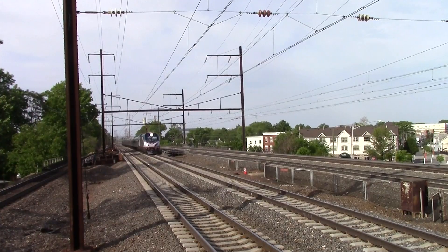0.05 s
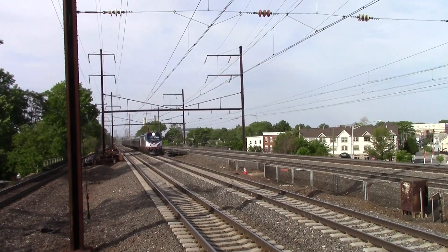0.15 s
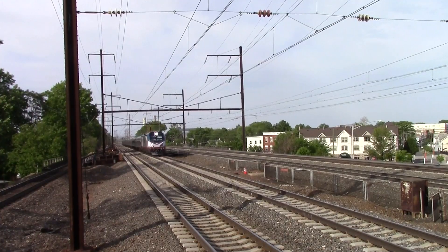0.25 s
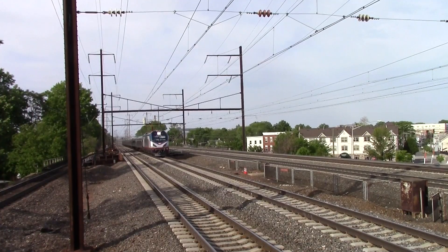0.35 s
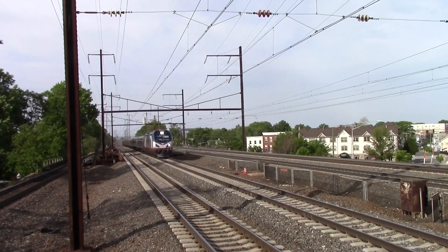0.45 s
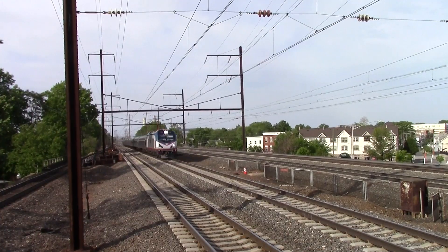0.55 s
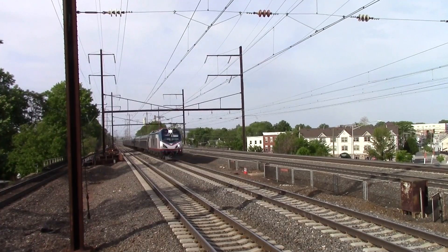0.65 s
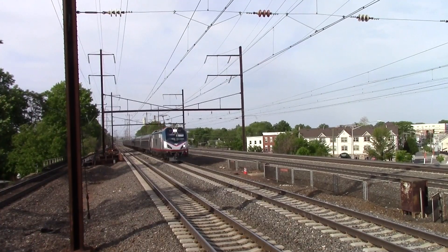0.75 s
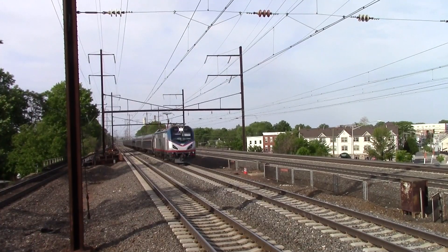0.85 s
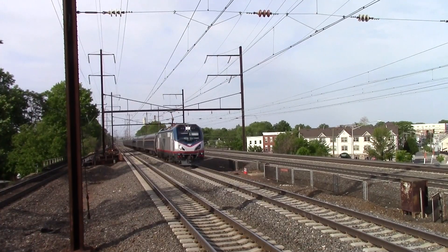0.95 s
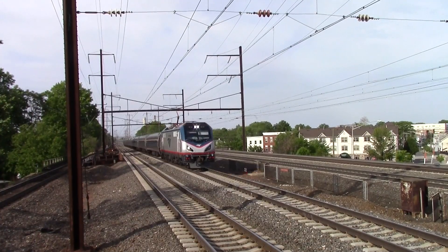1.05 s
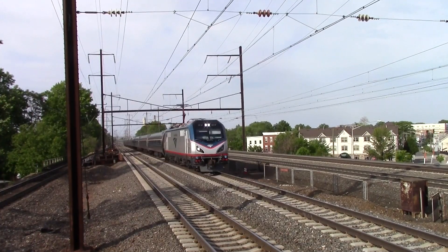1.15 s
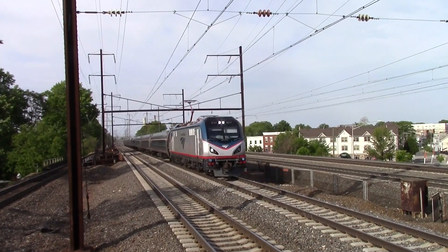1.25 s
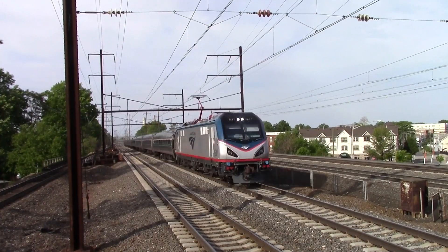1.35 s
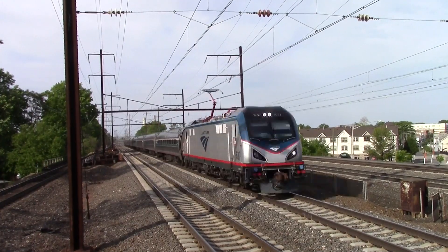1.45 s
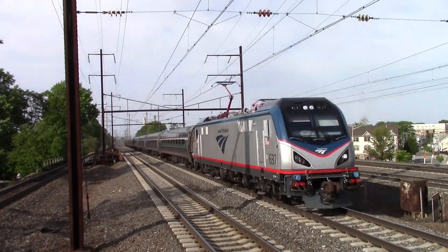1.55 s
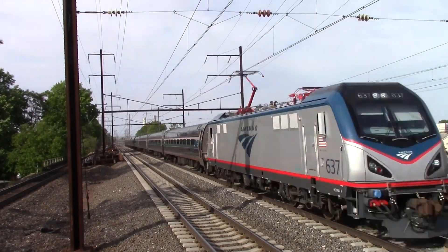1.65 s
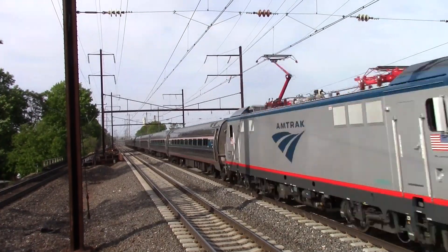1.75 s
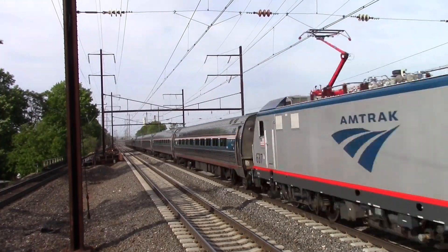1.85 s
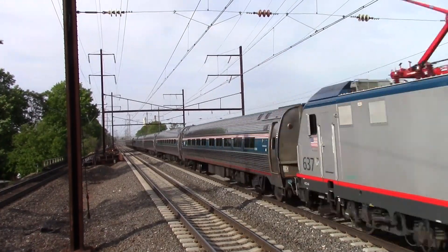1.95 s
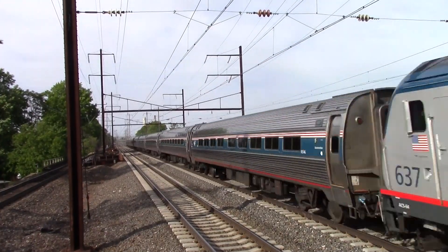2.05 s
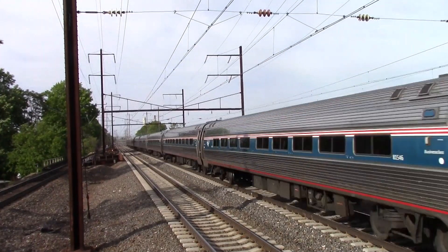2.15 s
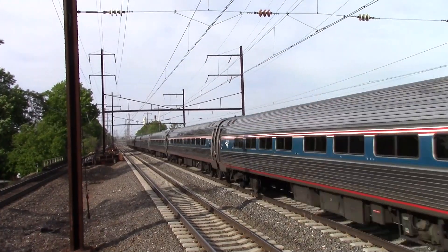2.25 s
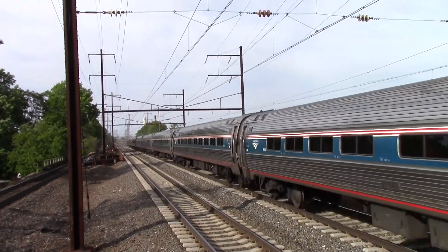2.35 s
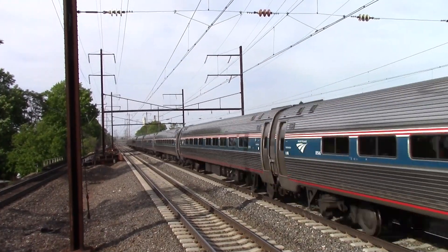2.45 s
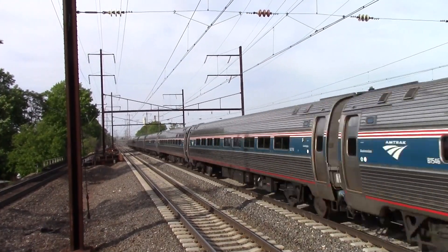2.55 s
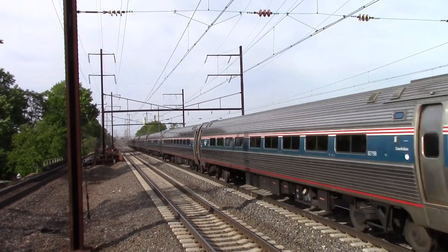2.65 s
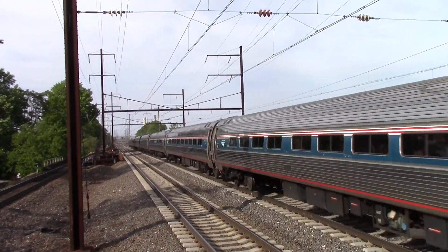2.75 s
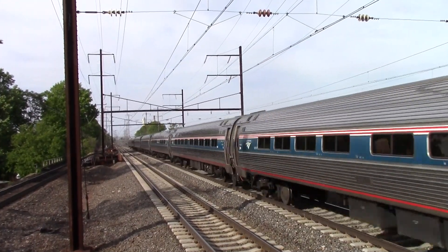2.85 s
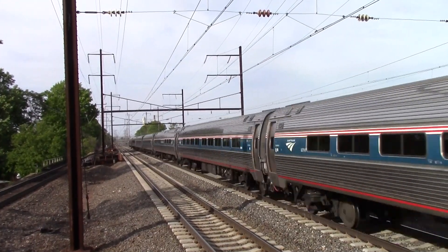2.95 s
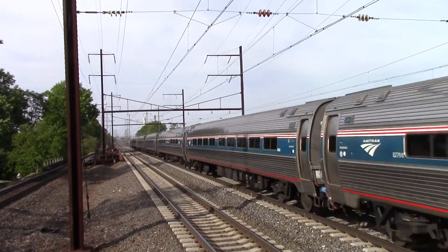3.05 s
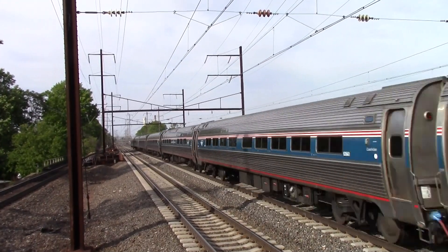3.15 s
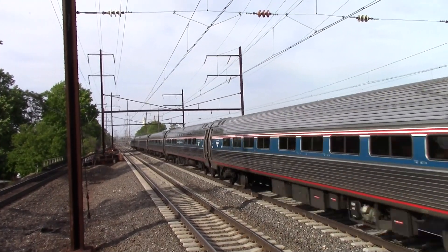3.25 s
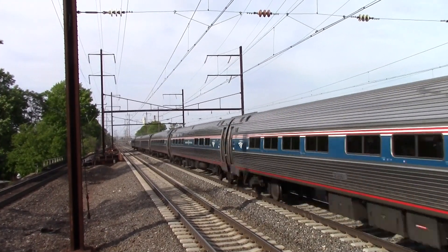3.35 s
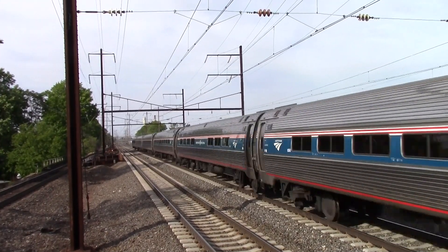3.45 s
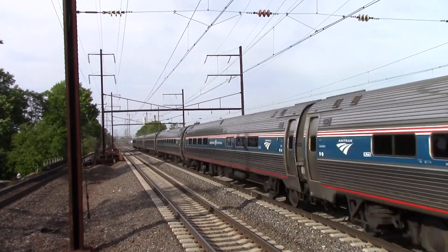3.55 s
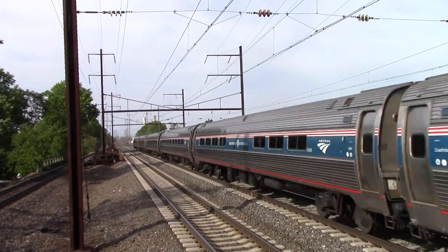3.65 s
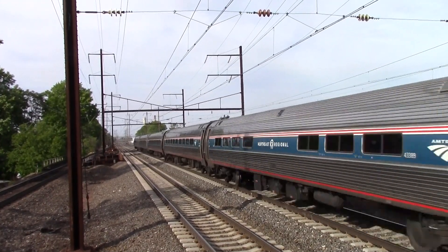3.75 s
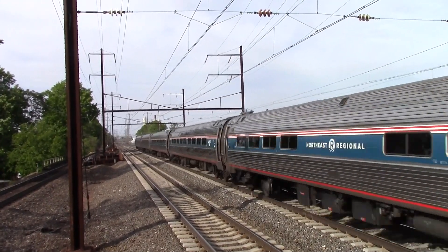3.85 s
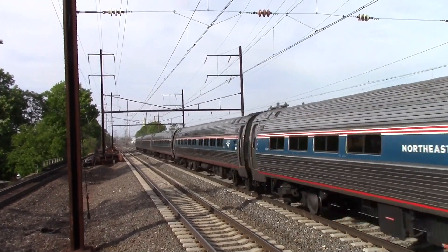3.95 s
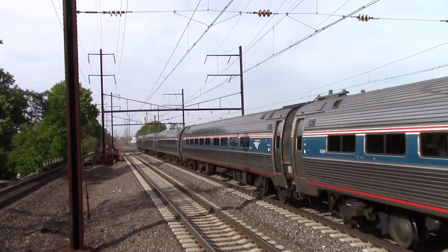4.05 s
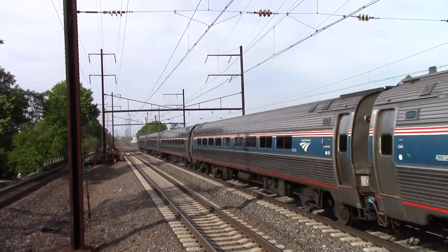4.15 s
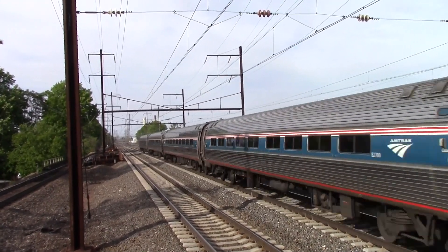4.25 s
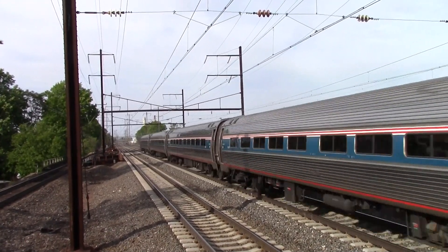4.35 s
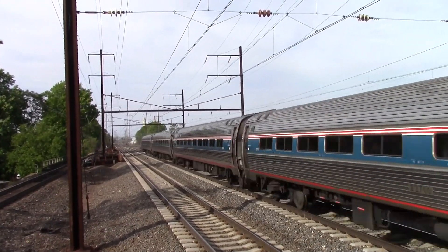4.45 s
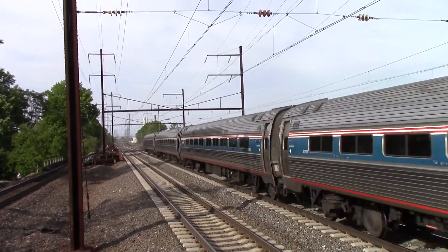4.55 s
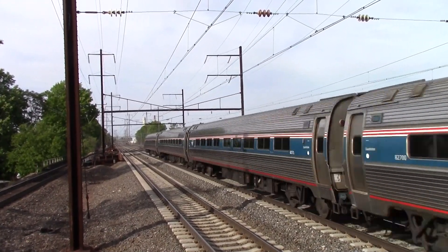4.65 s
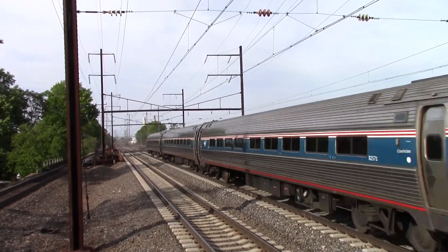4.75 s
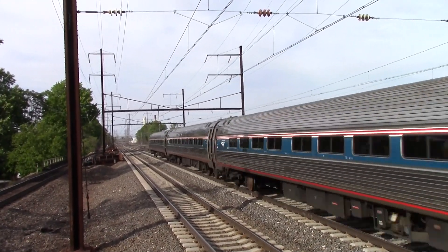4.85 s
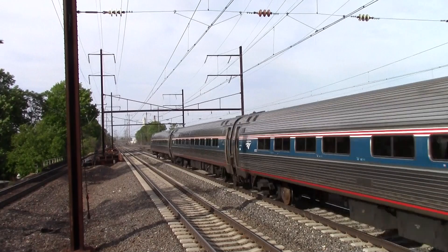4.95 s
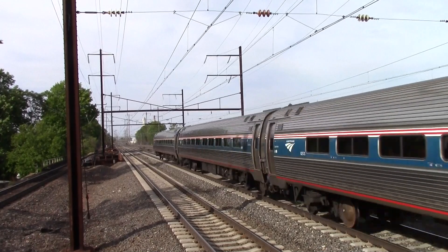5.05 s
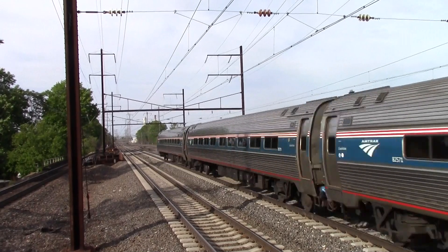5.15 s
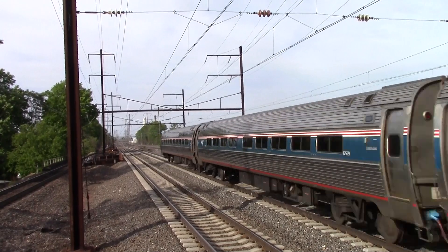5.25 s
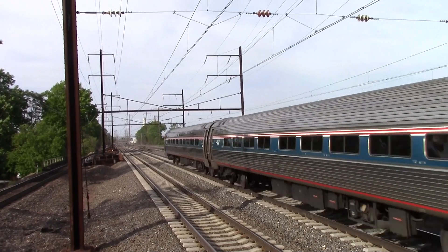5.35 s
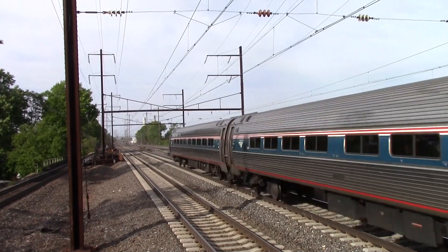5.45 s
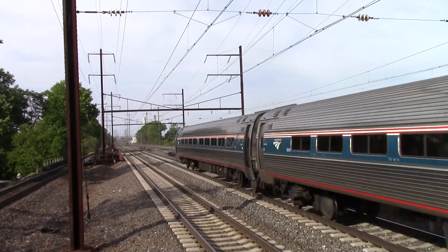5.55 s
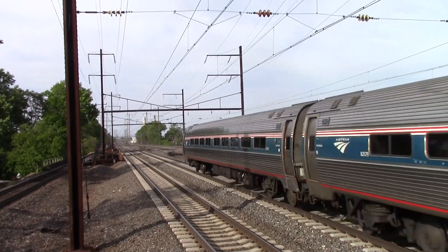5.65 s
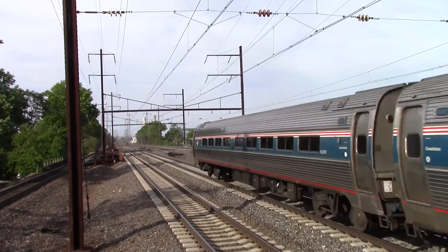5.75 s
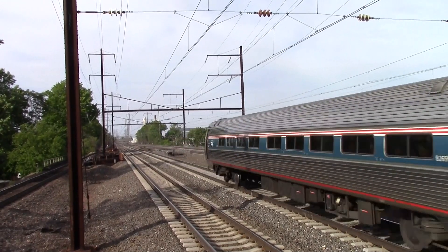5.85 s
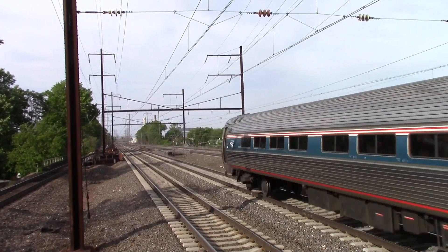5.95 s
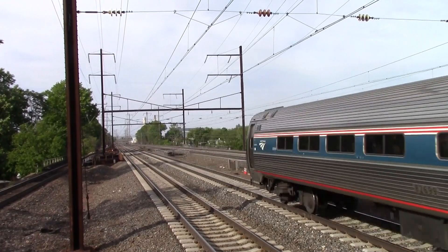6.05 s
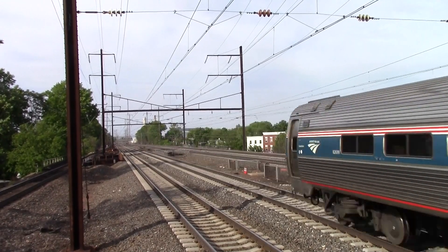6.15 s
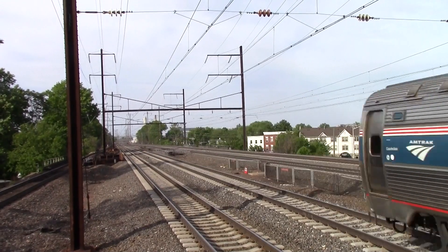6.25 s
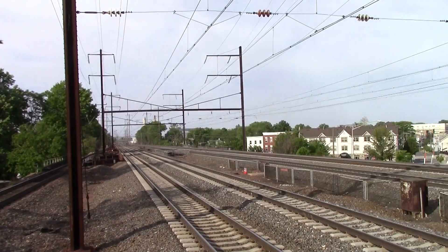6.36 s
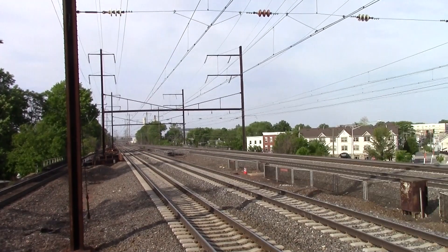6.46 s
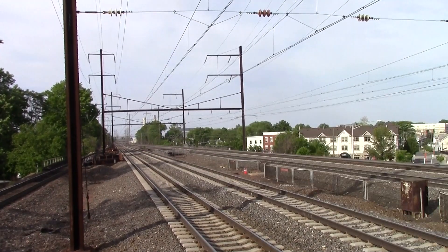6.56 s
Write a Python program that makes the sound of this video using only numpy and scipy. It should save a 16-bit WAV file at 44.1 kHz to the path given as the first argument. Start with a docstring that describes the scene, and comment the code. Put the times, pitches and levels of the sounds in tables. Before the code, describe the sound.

Faint rail hum and a horn blast swell into a loud rushing locomotive pass, followed by pulsing coach roll and sharp wheel clacks.

```python
"""An electric train runs past at speed, a few metres from the listener: noise layers roar, roll and hiss.
Far off the rails sing in narrow noise bands; a five-bell horn, built from sines, sags in pitch as it nears.
The locomotive roars by with a falling howl, then coaches roll past in swells, one for each pair of bogies.
Wheels clatter over rail joints as short noise bursts with ringing rims, and thin falling whistles pass."""
import sys
import numpy as np
from scipy import signal
from scipy.fft import rfft, irfft, next_fast_len
from scipy.io import wavfile
from scipy.ndimage import uniform_filter1d, map_coordinates

SR = 44100
rng = np.random.default_rng(int(sys.argv[2]) if len(sys.argv) > 2 else 0)


def put_to_file(sound):
    """Save the sound as 16-bit audio at rate SR, in the file named by the first command-line argument."""
    columns = np.atleast_2d(sound).T  # one column per channel
    safe = np.clip(columns, -1, 1)
    whole_steps = np.round(safe * 32767)
    wavfile.write(sys.argv[1], SR, whole_steps.astype(np.int16))


N = 290751

# The running train between wheel blows, before swells and trims.
# Each row: time in seconds, rush in dB, low body in dB, hiss in dB.
TRAIN_LEVELS = [(0, -42, -71, -73), (0.35, -35.5, -65, -58), (0.65, -37.5, -60, -51.5),
                (0.86, -28.5, -50.5, -38.5), (1.02, -25.5, -56, -33), (1.2, -18.5, -46, -28.5),
                (1.62, -15, -39, -21.5), (1.74, -17, -34, -21.5), (1.87, -13.5, -35.5, -23.5),
                (2.33, -13.5, -44, -26.5), (2.6, -20.5, -44.5, -31), (2.77, -25, -69, -35),
                (3.6, -25, -69, -39.5), (4.12, -25, -67.5, -38), (4.42, -25.5, -61.5, -34.5),
                (5.22, -27, -57.5, -39.5), (5.65, -21, -47, -32), (6.3, -17, -41.5, -31.5),
                (6.59, -19.5, -41.5, -37.5)]
# Singing wheel rims within the rolling noise, before the rush level. Each row: time in seconds, level in dB.
RIM_SONG_LEVELS = [(5.2, -10.5), (5.6, -8)]

# Noise colours, made rms 1 before use. Each row: frequency in Hz, relative level in dB per Hz.
FAR_ROAR_COLOUR = [(150, -43), (300, -26.5), (430, -19), (560, -25), (760, -5), (980, -2.5), (1400, -1),
                   (1800, 1.5), (2800, -4), (3900, -9), (4900, -14), (6500, -51)]
LOCO_ROAR_COLOUR = [(250, -30.5), (420, -14.5), (522, -38), (566, -17), (613, -24), (695, -8.5), (780, -14),
                    (1110, -3.5), (1520, 1.5), (1860, -0.5), (3120, -5), (3580, -10), (6500, -26),
                    (8450, -27), (14300, -120)]
ROLLING_COLOUR = [(260, -66), (450, -64), (651, -13.5), (711, -14.5), (1010, -7), (1290, -6.5),
                  (1420, -3.5), (1610, -0.5), (1820, -1), (2100, 1.5), (2720, -5.5), (2970, -4.5),
                  (3220, -8.5), (4600, -18.5), (6500, -16.5), (8450, -26), (14300, -120)]
BODY_COLOUR = [(100, -44), (190, -35), (280, -6.5), (400, 1.5), (560, 8), (800, 12.5), (1500, -32)]  # the car bodies' low roar
AHEAD_HISS_COLOUR = [(3500, 4), (4700, 1), (5700, -3), (6800, -1), (8400, -5), (11000, -14), (13500, -27),
                     (15500, -51)]  # the hiss while the train is still ahead
BESIDE_HISS_COLOUR = [(2470, 1), (4200, 6.5), (5890, 4.5), (8220, 2), (12500, -13), (15500, -38)]
LOW_NOISE_COLOUR = [(20, -3), (130, -2), (300, 0), (600, -34)]  # faint low noise that comes up when the train is loud
BLOW_COLOUR = [(260, -41), (450, -60), (673, -15.5), (1040, -6), (1300, -5.5), (1640, 5), (1840, -2.5),
               (2190, 4.5), (2600, -3), (2920, -1.5), (3780, -9.5), (4120, -12), (7880, -21.5),
               (11000, -35), (14000, -72)]  # the steely crack of wheel on joint
THUD_COLOUR = [(120, -54), (250, -10.5), (450, -10.5), (650, 7), (800, 12.5), (1100, 7.5), (2200, -43)]
SPIT_COLOUR = [(1300, 0), (3500, 2), (8500, -16), (14000, -48)]  # air as the horn's valve opens
FLOOR_COLOUR = [(60, -26), (300, -8), (6000, 2.5), (10000, 2.5), (13000, -4), (15500, -25)]  # the faint steady hiss under everything

# Resonances of the rails far ahead, and of the coach wheels' rims.
# Each row: frequency in Hz, distance from it to half amplitude in Hz, relative level in dB.
RAIL_MODES = [(1106, 35, -14), (1356, 32, -8.5), (1453, 24, -9), (1790, 93, -19.5)]
RIM_MODES = [(1570, 42, -18), (2100, 48, -19), (2230, 185, 13.5), (2980, 76, -4.5)]

# Stereo width of the noise. Each row: frequency in Hz, side minus mid in dB.
STEREO_WIDTH = [(60, -11), (350, -60), (900, -60), (1300, -38), (2400, -28), (4500, -14), (8500, -3),
                (12000, 6)]
# Stereo balance. Each row: frequency in Hz, left minus right in dB.
STEREO_LEAN = [(1700, 0), (2400, 1.5), (3400, 1.2), (4800, 2.6), (7000, 1.2), (9500, 1.6), (13000, -1.2)]
# Stereo phase. Each row: frequency in Hz, lead of the right ear in radians.
RIGHT_EAR_LEAD = [(4000, 0), (6300, 0.79), (8500, 0.24), (11000, 0.56)]

# The horn's bells as heard from far ahead. Each row: pitch in Hz, then harmonics 1 to 7 in dB.
HORN_BELLS = [(367, -34.5, -34, -22, -24.5, -29, -34, -40), (436.4, -31.5, -25.5, -28, -26, -28, -47, -30),
              (504.4, -30, -25, -23, -26.5, -25, -36, -39), (576, -33, -30, -31, -35, -32, -38, -44),
              (704.6, -30.5, -27.5, -28, -25.5, -32, -37, -41)]
# Horn blasts, the first one faint, before distance gain.
# Each row: start in seconds, end in seconds, level in dB.
HORN_BLASTS = [(0, 0.273, -21), (1.001, 1.691, 1)]
# Wheels striking the rail joints, mostly in pairs as a bogie's two axles cross. Each row: start in
# seconds, relative level in dB, length of the rattle in seconds, thud relative to the blow in dB.
WHEEL_STRIKES = [(1.87, 1, .035, -15), (2.057, -9.5, 0.04, -12), (2.12, -3, 0.025, -11),
                 (2.257, -3, 0.047, -14), (2.319, 1.5, 0.028, -19), (2.455, -9, 0.021, -10),
                 (2.511, -11, 0.012, -6), (2.64, -3.5, 0.044, -17.5), (2.69, -8.5, .028, -25),
                 (2.793, -7.5, 0.043, -34), (2.843, -10.5, 0.052, -24), (2.885, -13, .018, -29),
                 (2.977, -7.5, 0.026, -20), (3.029, -7.5, 0.034, -25), (3.154, -5.5, 0.023, -22),
                 (3.175, -6.5, 0.018, -31), (3.212, -8.5, 0.065, -31), (3.341, -4, 0.039, -22),
                 (3.393, -6.5, 0.04, -24), (3.496, -12.5, 0.025, -13.5), (3.689, -12.5, 0.041, -31),
                 (3.736, -7.5, 0.029, -35), (3.885, -10, 0.059, -29), (3.918, -9, 0.039, -32),
                 (4.076, -6, 0.034, -30), (4.212, -4, 0.044, -23.5), (4.263, -6.5, 0.026, -27),
                 (4.368, -7, 0.028, -37), (4.391, -7.5, 0.06, -25), (4.44, -9.5, 0.047, -19),
                 (4.551, -6, 0.031, -20), (4.605, -7, 0.028, -21.5), (4.733, -6.5, 0.038, -27),
                 (4.786, -8.5, 0.028, -27), (4.917, -5.5, 0.037, -21), (4.968, -6.5, 0.044, -24),
                 (5.105, -9, .018, -31), (5.26, -8, 0.034, -14.5), (5.314, -11.5, 0.038, -18),
                 (5.444, -2, 0.032, -17), (5.494, -10.5, 0.032, -11.5), (5.554, -5.5, 0.0087, -27),
                 (5.612, -9, 0.015, -14), (5.785, -2, 0.046, -12.5), (5.95, -2.5, 0.028, -19),
                 (5.973, -2.5, 0.05, -11.5), (6.02, -6.5, 0.024, -11), (6.133, 2, 0.02, -15.5),
                 (6.185, 0.5, 0.053, -18.5), (6.311, 0, 0.031, -15.5), (6.358, -4, 0.031, -24),
                 (6.419, -1, 0.021, -24), (6.468, -5.5, 0.027, -30), (6.503, 0, 0.011, -13),
                 (6.522, -3.5, 0.035, -18), (6.583, -3, 0.0099, -12)]
# Howl swells of the locomotive's running gear.
# Each row: loudest moment in seconds, level in dB, time from it to 1/e in seconds.
HOWL_SWELLS = [(1.935, -11, 0.028), (2.11, -15, 0.01), (2.155, -16, 0.026), (2.204, -14, .016),
               (2.39, -13.5, 0.026)]
# Thin falling whistles from passing bogies. Each row: loudest moment in seconds, level in dB,
# time from it to 1/e in seconds, pitch at the loudest in Hz.
BOGIE_WHISTLES = [(4.83, -35, 0.049, 8430), (5.545, -40, 0.088, 8450), (6.04, -38, 0.05, 8500),
                  (6.378, -37, 0.083, 8650)]

SPEED_M_S = 49.5
# when the first coach reaches the rail joints, and the time each coach takes to go by
FIRST_COACH_S, COACH_S = 2.273, 0.525
# swell peak after the front bogie meets the first joint, and dB per unit of swell
SWELL_LAG_S, SWELL_RUSH_DB, SWELL_HISS_DB = 0.048, 0.76, 2
# depth of drifting patches: distant roar and air hiss, rolling wheels, low noise
SMOOTH_PATCHY_DB, ROLLING_PATCHY_DB, LOW_NOISE_PATCHY_DB = 1.2, 2.1, 6
# how hard rough treads shake the lower bands: under the locomotive, under the coaches
LOCO_SHAKE_DB, COACH_SHAKE_DB = 1.7, 0.6
LOW_NOISE_BASE_DB = -54  # low noise level when the rush is at -9.5 dB

# when the horn draws level, and how far away it is then
HORN_PASS_S, TRACK_M = 1.92, 4.2
HORN_NEARING_DB = 13  # gain for a tenfold shorter distance
HORN_ATTACK_S, HORN_RELEASE_S = 0.011, 0.035
HORN_BEAM_DB_PER_KHZ = 15  # the bells beam their treble forward: its loss when heard side-on
HORN_ECHO_S, HORN_ECHO_DB, HORN_ECHO_DULL_DB_PER_KHZ = 0.13, -2.5, 9  # off the trackside
SPIT_DB, SPIT_S = -19.5, 0.032  # level and decay time
BRASS_DB, BRASS_FALL_DB_PER_KHZ = -33.5, 6  # the harmonics above the seventh; they fall from 3 kHz
HORN_FLUTTER_DB = 2.2
HORN_SCATTER_RAD = 0.45  # phase scatter, times kHz + 0.5 (at most 2)
# from afar the ground's echo cancels the middle harmonics, until the dip fills in between two times
GROUND_DIP_DB, GROUND_DIP_HZ, GROUND_DIP_OCTAVES = 10, 1180, 1
GROUND_FILL_S = (1.255, 1.35)

STRIKE_ATTACK_S, CHATTER_DB, THUD_PATCHY_DB = 0.001, 1.4, 0.8
THUMP_DB, THUMP_PATCHY_DB = -70, 4  # faint low thump under hard blows
HOWL_HZ, HOWL_FALL_HZ_PER_S = 1548, 480  # pitch at the first swell, and its fall
WHISTLE_WIDTH_HZ = 420
TOP_HZ = 15650


def amp(db):
    """Decibels to gain."""
    return 10 ** (np.asarray(db) / 20)


def unit(x):
    """Scaled to rms 1."""
    return x / np.sqrt(np.mean(x ** 2) + 1e-20)


def along(points, hz):
    """(Hz, value) points joined on a log frequency axis."""
    f, v = np.transpose(points)
    return np.interp(np.log(hz + 1), np.log(f + 1), v)


def clock():
    """The time of each sample in seconds."""
    return np.arange(N) / SR


def curves(rows):
    """One value per sample for each column after the time."""
    s, *columns = np.transpose(rows)
    return [np.interp(clock(), s, column) for column in columns]


def wobble(rate):
    """A smooth random curve with rate knots a second."""
    return map_coordinates(rng.standard_normal(2048), [clock() * rate + 2], mode="wrap")


def filtered(x, response):
    """x filtered by a response given as a function of frequency."""
    m = next_fast_len(N + 8192)
    spectrum = rfft(x, m) * response(np.fft.rfftfreq(m, 1 / SR))
    return irfft(spectrum, m)[..., :N]


def shaped(colour):
    """The response of (Hz, dB) points, falling away below the first."""
    return lambda hz: amp(along(colour, hz)) * np.minimum(hz / colour[0][0], 1) ** 2


def resonant(modes):
    """The response of a set of resonances with steep skirts."""
    def response(hz):
        total = 0
        for centre, width, db in modes:
            detuning = (hz ** 2 - centre ** 2) / (2 * width)
            total = total + amp(db) * hz ** 2 / (hz ** 2 + detuning ** 2)
        return total
    return response


def rush(response, patchy_db):
    """Stereo noise, its mid at rms 1, with gain drifting in patches; STEREO_WIDTH parts the ears."""
    z = signal.stft(rng.standard_normal((2, N)), nperseg=1024)[2]
    field = rng.standard_normal(z.shape[1:])
    field = uniform_filter1d(field, size=5, axis=0)  # smooth over frequency
    field = uniform_filter1d(field, size=7, axis=1)  # and over time
    pair = signal.istft(z * amp(patchy_db * unit(field)), nperseg=1024)[1][:, :N]

    def mid_side_response(hz):
        return response(hz) * np.array([np.ones_like(hz), amp(along(STEREO_WIDTH, hz))])

    mid, side = filtered(pair, mid_side_response)
    return np.array([mid + side, mid - side]) / np.std(mid)


def handover(start, end):
    """Equal-power gains of a source that leaves and one that arrives."""
    progress = np.clip((clock() - start) / max(end - start, 0.01), 0, 1)
    turn = np.pi / 2 * progress
    return np.cos(turn), np.sin(turn)


def band(centre_hz, width_hz):
    """Narrow noise of rms 1 around a fixed or moving centre."""
    slow = filtered(rng.standard_normal((2, N)), lambda hz: 1 / (1 + (hz / width_hz) ** 2))
    phase = 2 * np.pi * np.cumsum(centre_hz * np.ones(N)) / SR
    return unit(slow[0] * np.cos(phase) + slow[1] * np.sin(phase))


def swells():
    """0.5 while bogies go by; after the first coach, a short lull to -1.5 under each coach's middle."""
    cycles = (clock() - SWELL_LAG_S - FIRST_COACH_S) / COACH_S
    return 0.5 - 2 * (cycles > 1) * np.sin(np.pi * cycles) ** 4


def running_noise():
    """Wheels, air and car bodies roar: first far off, then from the locomotive, then from the coaches."""
    rush_db, body_db, hiss_db = curves(TRAIN_LEVELS)
    rim_db, = curves(RIM_SONG_LEVELS)
    swell = swells()
    rush_db = rush_db + SWELL_RUSH_DB * swell
    hiss_db = hiss_db + SWELL_HISS_DB * swell
    far, arrived = handover(1.12, 1.36)
    leaving, coaches = handover(2.11, 2.84)
    ahead, beside = handover(1.81, 1.86)

    distant = amp(2.0) * far * rush(shaped(FAR_ROAR_COLOUR), patchy_db=SMOOTH_PATCHY_DB)
    roar = amp(0.5) * arrived * leaving * rush(shaped(LOCO_ROAR_COLOUR), patchy_db=1.5)
    treads = rush(shaped(ROLLING_COLOUR), patchy_db=ROLLING_PATCHY_DB)
    rims = amp(rim_db) * rush(resonant(RIM_MODES), patchy_db=2.0)
    rolling = coaches * (treads + rims)
    body = amp(body_db + 9.5) * rush(shaped(BODY_COLOUR), patchy_db=2.5)

    # close by, rough treads shake the lower bands together
    shake_db = LOCO_SHAKE_DB * beside * leaving ** 2 + COACH_SHAKE_DB * coaches ** 2
    shake = amp(shake_db * wobble(75))

    hiss_ahead = ahead * rush(shaped(AHEAD_HISS_COLOUR), patchy_db=SMOOTH_PATCHY_DB)
    hiss_beside = beside * rush(shaped(BESIDE_HISS_COLOUR), patchy_db=SMOOTH_PATCHY_DB)
    hiss = amp(hiss_db + 0.5) * (hiss_ahead + hiss_beside)

    # faint low noise that comes up when the train is loud: 2 dB for each dB of rush
    low_gain = arrived * amp(LOW_NOISE_BASE_DB + 2 * (rush_db + 9.5))
    low_noise = low_gain * rush(shaped(LOW_NOISE_COLOUR), patchy_db=LOW_NOISE_PATCHY_DB)
    return shake * (amp(rush_db) * (distant + roar + rolling) + body) + hiss + low_noise


def rail_song(level_db=-38.5, growth_db=6.0):
    """Rails carry narrow, wavering tones far ahead of the train, growing by growth_db a second."""
    far, _ = handover(1, 1.2)
    gain = far * amp(level_db + growth_db * clock() + 1.6 * wobble(11.9))
    return gain * rush(resonant(RAIL_MODES), patchy_db=0.5)


def horn_chord(doppler, dull_db_per_khz):
    """Five reed bells, hollow from afar and fuller close by; turbulent air makes short waves waver most."""
    chord = np.zeros(N)
    span = clock() < HORN_PASS_S
    t = clock()[span]
    dull = dull_db_per_khz[span]

    def waver(rate):
        coarse = t[::64]
        knots = rng.standard_normal(256)
        return np.interp(t, coarse, map_coordinates(knots, [coarse * rate], mode="wrap"))

    afar = np.interp(t, GROUND_FILL_S, [1, 0])
    for pitch, *harmonics in HORN_BELLS:
        heard_hz = pitch * doppler[span] * (1 + 0.0014 * waver(25.0))
        phase = 2 * np.pi * np.cumsum(heard_hz) / SR
        for k in range(1, int(7500 / pitch) + 1):
            khz = k * pitch / 1000
            brass_db = BRASS_DB - BRASS_FALL_DB_PER_KHZ * max(khz - 3, 0)
            db = harmonics[k - 1] if k <= len(harmonics) else brass_db
            octaves = np.log2(k * pitch / GROUND_DIP_HZ)
            db = db - GROUND_DIP_DB * afar * np.exp(-(octaves / GROUND_DIP_OCTAVES) ** 2)
            depth_db = min(4 * khz, 2.3)
            flicker_db = depth_db * waver(13.05) + HORN_FLUTTER_DB * waver(55.27)
            scatter = HORN_SCATTER_RAD * min(khz + 0.5, 2) * waver(28)
            tone = np.sin(k * phase + scatter + rng.uniform(0, 2 * np.pi))
            chord[span] += amp(db - dull * khz + flicker_db) * tone
    return np.sqrt(2) * chord


def horn():
    """The chord grows as it nears, and sags as its path turns sideways; the trackside answers."""
    t = clock()
    ahead_m = SPEED_M_S * (HORN_PASS_S - t)
    distance_m = np.hypot(ahead_m, TRACK_M)
    mach = SPEED_M_S / 343
    doppler = (1 - mach) / (1 - mach * ahead_m / distance_m)  # 1 from far ahead

    blown = np.zeros(N)
    for start, end, db in HORN_BLASTS:
        attack = np.clip((t - start) / HORN_ATTACK_S, 0, 1)
        release = np.exp(-np.maximum(t - end, 0) / HORN_RELEASE_S)
        blown += amp(db) * attack * release
    gain = blown * amp(-0.5 - HORN_NEARING_DB * np.log10(distance_m / 20))
    dull = HORN_BEAM_DB_PER_KHZ * (TRACK_M / distance_m) ** 2

    since = t - HORN_BLASTS[-1][0]  # only the last blast spits
    spit_gain = amp(SPIT_DB) * np.clip(since / HORN_ATTACK_S, 0, 1) * np.exp(-np.abs(since) / SPIT_S)
    spit = spit_gain * rush(shaped(SPIT_COLOUR), patchy_db=1)

    direct = gain * horn_chord(doppler, dull)
    echo = gain * horn_chord(doppler, dull + HORN_ECHO_DULL_DB_PER_KHZ)
    late_echo = np.pad(echo, (round(HORN_ECHO_S * SR), 0))[:N]
    return direct + spit + amp(HORN_ECHO_DB) * late_echo


def clatter():
    """Wheels crack on the joints; bogies rattle briefly, rims ring on, a faint low thump under hard blows."""
    blows, thuds, rings = np.zeros(N), np.zeros(N), np.zeros(N)
    for s, db, length, thud_db in WHEEL_STRIKES:
        start = min(round(s * SR), N)
        t = np.arange(min(SR // 4, N - start)) / SR
        here = slice(start, start + len(t))
        rise = amp(db) * (1 - np.exp(-t / STRIKE_ATTACK_S))
        burst = 0.9 * np.exp(-(t / length) ** 3) + 0.18 * np.exp(-t / 0.04)
        rattle = burst + 0.2 * np.exp(-t / 0.00088)
        blows[here] += rise * rattle
        thuds[here] += rise * rattle * amp(thud_db)
        rings[here] += rise * np.exp(-t / 0.039)
    chatter = amp(CHATTER_DB * wobble(300))  # loose parts knock many times within one blow
    steel = amp(-13.5) * blows * rush(shaped(BLOW_COLOUR), patchy_db=1.0)
    thud = amp(-7.5) * thuds * rush(shaped(THUD_COLOUR), patchy_db=THUD_PATCHY_DB)
    low_noise = rush(lambda hz: 1 / (1 + (hz / 150) ** 4), patchy_db=THUMP_PATCHY_DB)
    thump = amp(THUMP_DB) * blows ** 1.5 * low_noise
    ringing = amp(-18.5) * rings * rush(resonant(RIM_MODES), patchy_db=3.5)
    return chatter * (steel + thud) + thump + ringing


def howl():
    """The locomotive's running gear howls in a narrow falling band, with a brief lower hoot."""
    t = clock()
    centre_hz = HOWL_HZ - HOWL_FALL_HZ_PER_S * np.clip(t - HOWL_SWELLS[0][0], -1, 1)
    level = sum(amp(db) * np.exp(-((t - s) / length) ** 2) for s, db, length in HOWL_SWELLS)
    hoot_level = amp(-23.0) * np.exp(-((t - 2.015) / 0.027) ** 2)
    hoot = hoot_level * band(0.45 * centre_hz, width_hz=24)
    return level * band(centre_hz, width_hz=52) + hoot


def whistles(fall=0.96):
    """Each whistle swells and drops in pitch as its bogie goes by; fall is the share lost a second."""
    out = np.zeros(N)
    for s, db, length, hz in BOGIE_WHISTLES:
        t = np.clip(clock() - s, -0.4, 0.4)
        out += amp(db) * np.exp(-(t / length) ** 2) * band(hz * (1 - fall * t), WHISTLE_WIDTH_HZ)
    return out


def placed(train):
    """The image is narrow while the train is ahead and opens as it draws alongside."""
    ears = np.array([[0.5], [-0.5]])

    def ear_response(hz):
        lean = amp(ears * along(STEREO_LEAN, hz))
        return lean * np.exp(-1j * ears * along(RIGHT_EAR_LEAD, hz))

    left, right = filtered(train, ear_response)
    opening = amp(np.interp(clock(), [1.5, 2.1], [-17, 0]))
    return (left + right) / 2 + ears * opening * (left - right)


def scene():
    """The whole train over a faint steady hiss."""
    train = running_noise() + rail_song() + horn() + clatter() + howl() + whistles()
    return placed(train) + amp(-52.0) * rush(shaped(FLOOR_COLOUR), patchy_db=0.5)


def record(dry):
    """Rounds off the highest peaks, then cuts everything from TOP_HZ up."""
    top = 0.98
    rounded = dry / (1 + np.abs(dry / top) ** 8) ** (1 / 8)
    return filtered(rounded, lambda hz: hz < TOP_HZ)


dry = scene()
out = record(dry)
put_to_file(out)
```